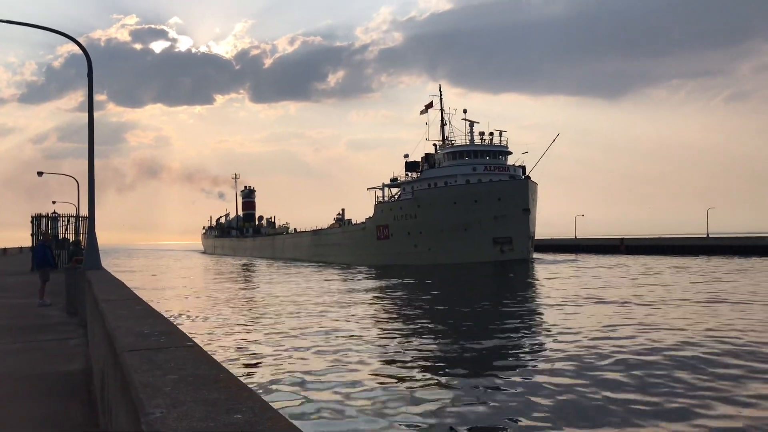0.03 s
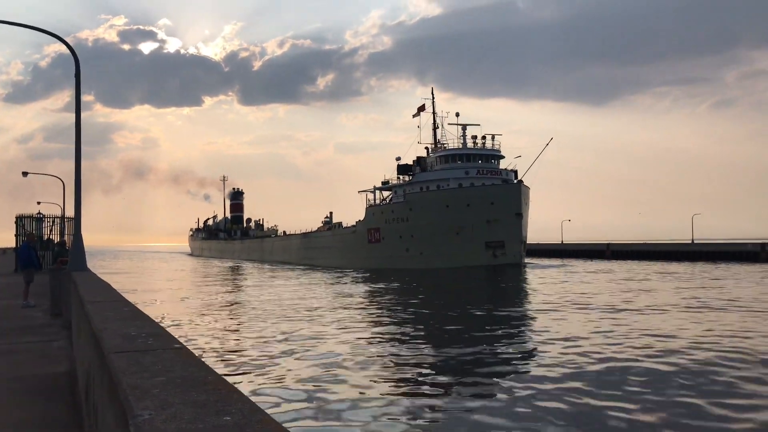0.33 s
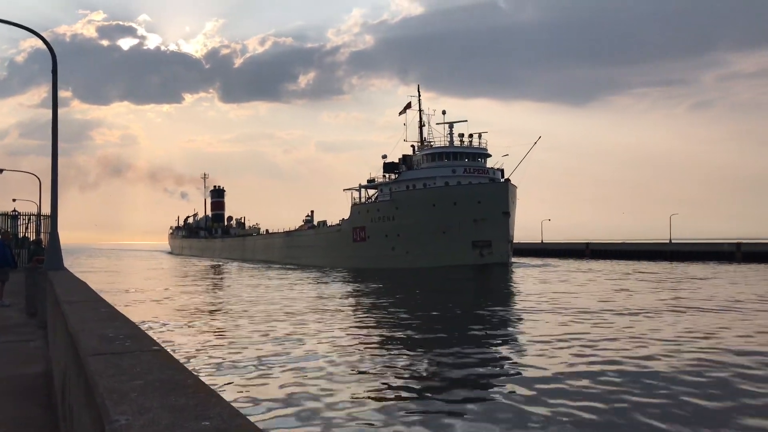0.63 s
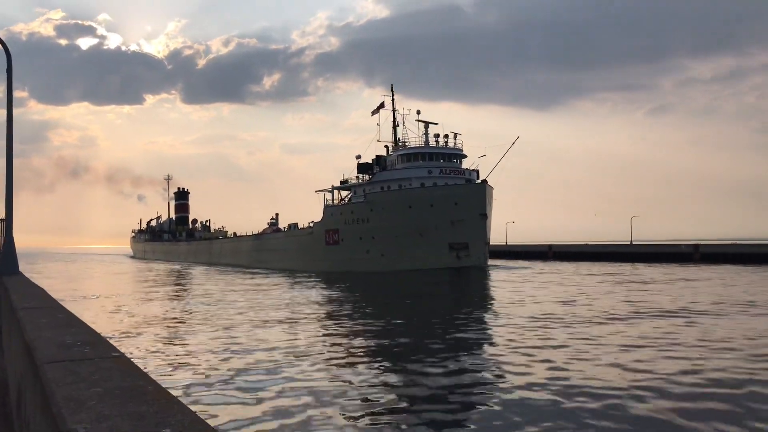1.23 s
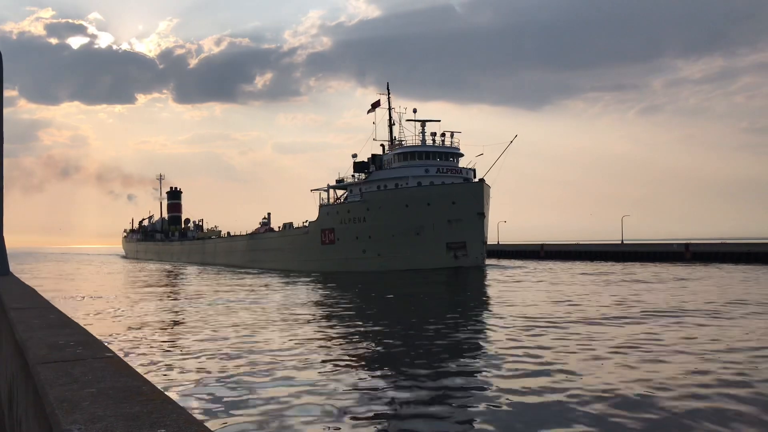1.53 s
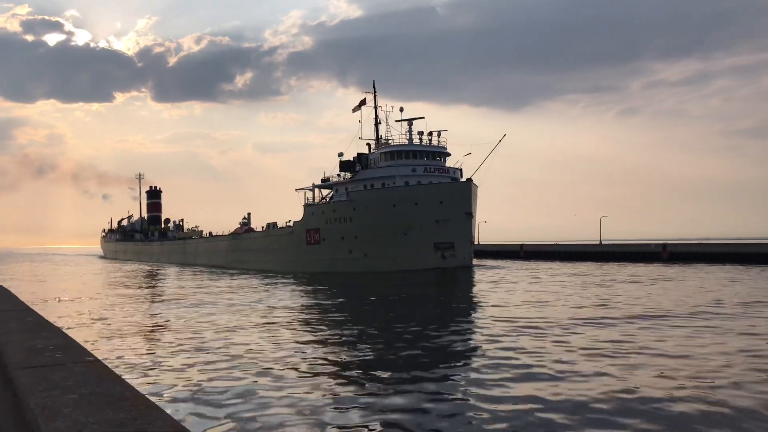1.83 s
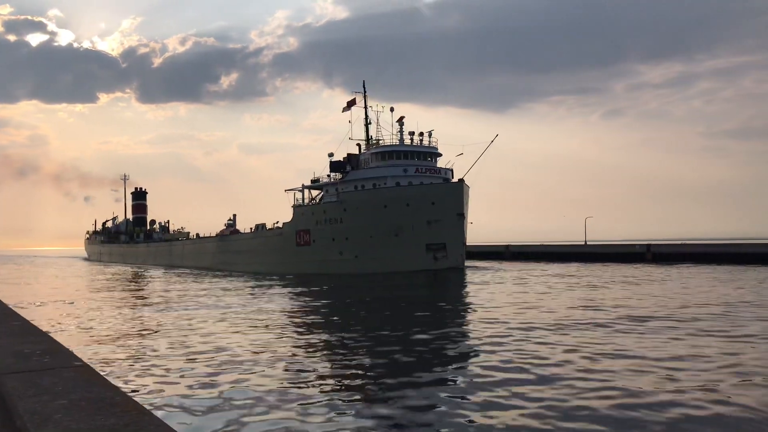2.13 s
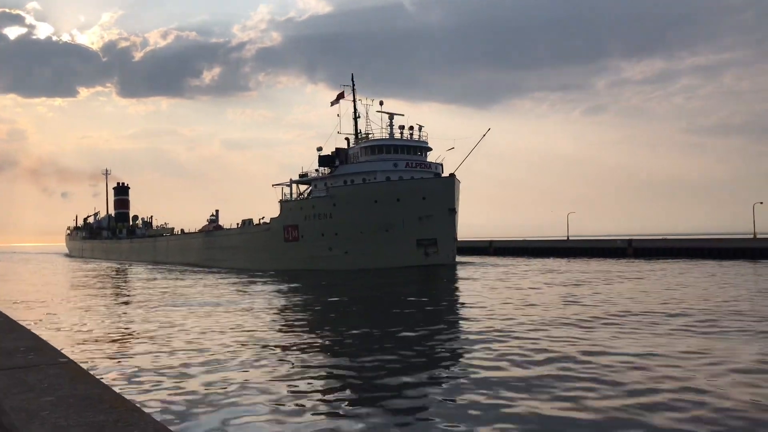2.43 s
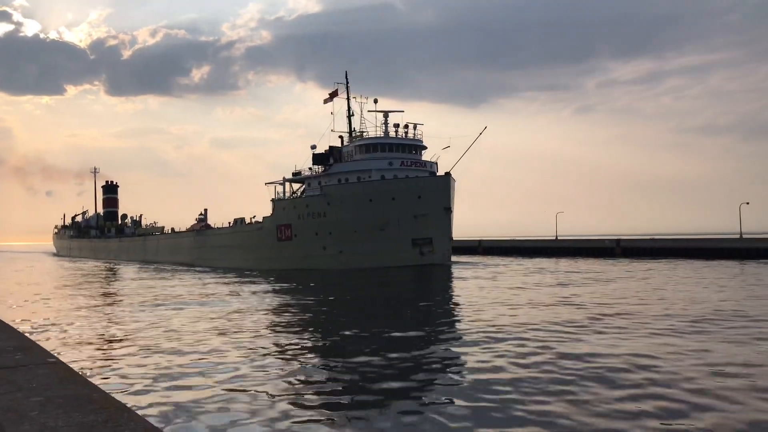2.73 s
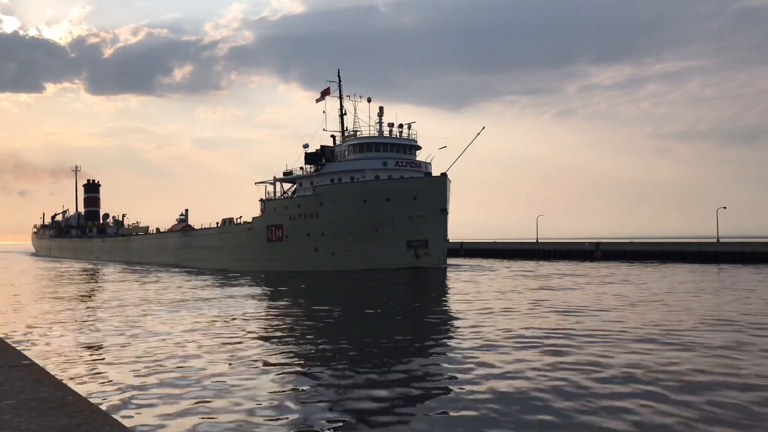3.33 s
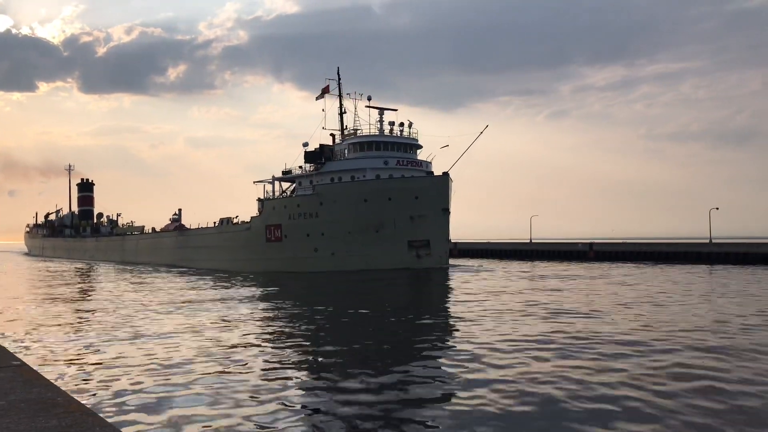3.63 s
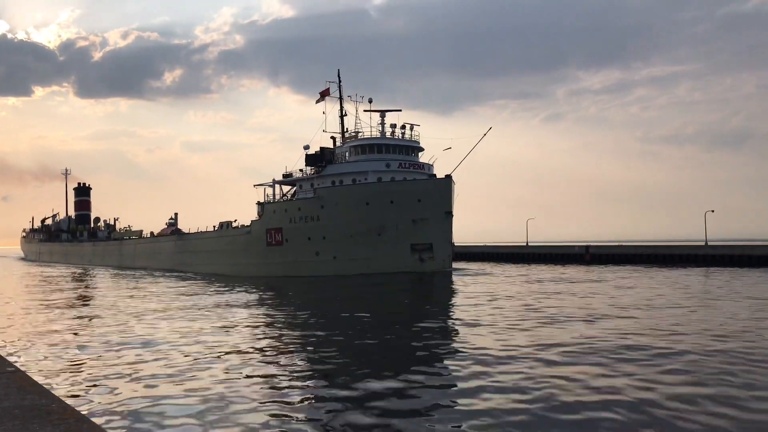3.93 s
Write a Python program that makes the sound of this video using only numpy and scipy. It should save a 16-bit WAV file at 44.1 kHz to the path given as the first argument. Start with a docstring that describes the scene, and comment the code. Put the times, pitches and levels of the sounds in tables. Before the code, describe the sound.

A ship's horn sounds one loud, low, brassy blast and cuts off almost at once. Its echoes swell and fade across a canal, heard from the pier, sinking into quiet engine rumble, wind and rippling water.

```python
"""A ship's air horn ends one low, brassy blast over a canal.
Its diaphragm chops the air into sharp pulses, a harmonic series that a pier and a wall reflect at once.
The shore returns the note by many paths in swelling, fading echoes; a far wall returns it still buzzing.
The echoes sink into the broadband noise of engine rumble, wind and rippling water."""
import sys
import numpy as np
from scipy import signal
from scipy.fft import rfft, irfft
from scipy.io import wavfile
from scipy.ndimage import uniform_filter1d

SR = 44100
rng = np.random.default_rng(int(sys.argv[2]) if len(sys.argv) > 2 else 0)


def store_pcm(level_fs):
    """Save levels as 16-bit WAV."""
    pcm = np.round(np.clip(level_fs, -1, 1) * 32767).astype(np.int16)
    wavfile.write(sys.argv[1], SR, np.atleast_2d(pcm).T)


N = 176400
T = np.arange(N) / SR
HZ = np.fft.rfftfreq(N, 1 / SR)
START_S, STOP_S = -.2, .4312  # the horn is already sounding at time zero
ECHO_HZ = 148.4  # fundamental of the reflected note


def amp(db):
    """Amplitude ratio of a level in decibels."""
    return 10 ** (np.asarray(db) / 20)


def unit(x):
    """Normalisation to rms 1."""
    return x / np.sqrt(np.mean(x ** 2) + 1e-20)


def curve(rows, t=T, column=1):
    """Linear interpolation of one table column in time."""
    rows = np.array(rows)
    return np.interp(t, rows[:, 0], rows[:, column])


def colour(spectrum, hz=HZ):
    """Spectral envelope: gain interpolated on a log-frequency axis."""
    freq_hz, level_db = np.transpose(spectrum)
    return amp(np.interp(np.log(hz + 1), np.log(freq_hz), level_db))


def noise(gain):
    """Spectrally shaped Gaussian noise of rms 1."""
    return unit(irfft(rfft(rng.standard_normal(N)) * gain, N))


def drift(rate_hz):
    """Random modulation: low-pass noise of rms 1."""
    return noise(1 / (1 + (HZ / rate_hz) ** 4))


def causal_filter(x, gain):
    """Minimum-phase filtering: the phase follows from the log gain by the Hilbert transform."""
    log_gain = np.log(np.maximum(gain, 1e-5))
    phase = -signal.hilbert(np.r_[log_gain, log_gain[-2:0:-1]]).imag[:len(gain)]
    response = irfft(gain * np.exp(1j * phase), N)[:4096]
    return signal.oaconvolve(x, response)[:len(x)]


# strength of the blast: time_s, level_db
BLAST_LEVEL = [(0, 2.5), (.14, 0.5), (.27, 4.3), (.36, 3), (.43, -3.5)]


def pulse_train(emitted_s, delay_s, path_db, wander_s):
    """Propagation delay: moving air varies the travel time of the pulses along one path."""
    jitter_s, flutter_db, shut_db_per_s = 4e-6, 1.56, 1710
    age = emitted_s - START_S
    travel_s = delay_s + wander_s * np.interp(age, T, drift(12))
    arrival = (age + travel_s + jitter_s * rng.standard_normal(len(age))) * SR
    flutter = flutter_db * np.interp(age, T, drift(52))
    shut_off = shut_db_per_s * np.maximum(emitted_s - STOP_S, 0)
    size = amp(path_db + curve(BLAST_LEVEL, emitted_s) + flutter - shut_off)
    taps = np.arange(-12, 13)  # a windowed sinc places each pulse between samples
    index = arrival.astype(int)[:, None] + taps
    train = np.zeros(N)
    np.add.at(train, index, size[:, None] * np.sinc(index - arrival[:, None]) * np.hanning(len(taps)))
    return train


# the horn's fundamental: time_s, pitch_hz
HORN_PITCH = [(0, 148.9), (.096, 147.9), (.172, 148.4), (.25, 148.8), (.33, 148.1), (.45, 148.5)]
# spectrum of one air pulse: frequency_hz, relative_db
PULSE_SPECTRUM = [(200, -34.5), (297, -1), (445, -23.5), (594, -2.5), (742, -1.5), (890, -1.5), (1040, 0),
                  (1190, 1), (1480, -6.5), (1850, -4), (2200, -12), (2600, -9), (3100, -10), (3500, -9),
                  (4500, -10.5), (5000, -15.5), (5500, -14.5), (6500, -20), (9000, -25.5), (10500, -33),
                  (13000, -37), (15500, -48)]
# four paths (direct, off the pier, off a wall's foot, off its face): delay_s
PATH_DELAYS = [0, .00789, .062, .0632]
# transmission along the same paths: relative_db, cutoff_hz, wander_s
PATH_TRANSMISSION = [(1, 4000, 0.0000064), (-4.5, 12000, 4e-5), (-7.5, 5700, 0.000072), (7, 1310, 0.00009)]


def horn():
    """Periodic excitation: the diaphragm releases one sharp pulse and one puff of air each cycle."""
    t = T + START_S
    pitch_hz = curve(HORN_PITCH, t)
    cycles = np.cumsum(pitch_hz) / SR
    cycles -= np.interp(STOP_S, t, cycles)  # zero at the shut-off
    emitted_s = np.interp(np.arange(int(cycles[0]) + 1, 4), cycles, t)
    pulse_gain = colour(PULSE_SPECTRUM)
    tone = np.zeros(N)
    for delay_s, (path_db, cutoff_hz, wander_s) in zip(PATH_DELAYS, PATH_TRANSMISSION):
        train = pulse_train(emitted_s, delay_s, path_db, wander_s)
        tone += causal_filter(train, pulse_gain / np.hypot(1, HZ / cutoff_hz))
    puff_decay_s, highpass_hz = .0027, 4250
    puffs = np.exp(-(cycles % 1) / pitch_hz / puff_decay_s) * (cycles < 1)
    highpass = (HZ / np.hypot(HZ, highpass_hz)) ** 2
    air = causal_filter(puffs * rng.standard_normal(N), pulse_gain * highpass)
    sounding = (t > 0) & (t < STOP_S)
    blast = amp(-15.5) * tone / tone[sounding].std() + amp(-35) * air / air[sounding].std()
    heard = blast[t >= 0]
    return np.pad(heard, (0, N - len(heard)))


def horn_fundamental():
    """Resonance: the fundamental lags each pulse and decays exponentially once the air is shut off."""
    lag_cycles, release_s = .33, .48
    sag_db_per_s, fade_db_per_s = 3, 131.5
    cycles = np.cumsum(curve(HORN_PITCH)) / SR
    cycles -= np.interp(STOP_S, T, cycles) + lag_cycles
    sag = sag_db_per_s * np.minimum(T, release_s)
    fade = fade_db_per_s * np.clip(T - release_s, 0, 1)
    return -np.sqrt(2) * amp(-13.5 - sag - fade) * np.cos(2 * np.pi * cycles)


def metallic_bite(x, spacing_hz=888, depth_db=2.6, onset_hz=2600):
    """Comb filtering: evenly spaced treble peaks make the blast sound metallic."""
    treble = 1 - 1 / (1 + (HZ / onset_hz) ** 6)
    return causal_filter(x, amp(depth_db * np.cos(2 * np.pi * HZ / spacing_hz) * treble))


def blurred_harmonics(spectrum, first, last):
    """Line broadening: many paths blur each harmonic into a noise band; the sum is held level."""
    harmonic = np.maximum(np.round(HZ / ECHO_HZ), 1)
    width_hz, steepness = .5 + harmonic, 1.714
    skirt = np.hypot(1, (HZ - harmonic * ECHO_HZ) / width_hz) ** steepness
    lines = colour(spectrum) / np.sqrt(width_hz) / skirt
    band = noise(lines * (harmonic >= first) * (harmonic <= last))
    return band / np.sqrt(uniform_filter1d(band ** 2, size=4000))


def near_scatter(cutoff_hz=3500, fade_db_per_s=106.5):
    """Diffuse scattering: near reflections surround the blast with a dull haze."""
    overtones = blurred_harmonics(PULSE_SPECTRUM, first=4, last=60)
    haze = causal_filter(overtones, 1 / (1 + (HZ / cutoff_hz) ** 2))
    return amp(-25 - fade_db_per_s * np.maximum(T - STOP_S, 0)) * haze


# spectral density of engine and wind: frequency_hz, relative_db
RUMBLE_SPECTRUM = [(20, -38), (31, -33), (42, -2.5), (55, -0.5), (69, 3.5), (80, -2), (100, -5.5),
                   (125, -7.5), (148, -1), (175, -10), (235, -11.5), (275, -12), (340, -11.5), (500, -34.5),
                   (900, -73)]
# envelope of the rumble: time_s, level_db
RUMBLE_ENVELOPE = [(0, -53), (.75, -59.5), (1.0, -45.5), (1.35, -42), (1.7, -40.5), (2.8, -40), (4, -40)]


def engine_rumble(throb_hz=8.1, throb_db=.5):
    """Amplitude modulation: the low noise of the ship's engine and the wind throbs unevenly."""
    throb = np.sin(2 * np.pi * throb_hz * T + .53 * drift(1.5))
    return amp(curve(RUMBLE_ENVELOPE) + throb_db * throb) * noise(colour(RUMBLE_SPECTRUM))


# spectral density of ripples and breeze: frequency_hz, relative_db
WASH_SPECTRUM = [(150, -20), (400, 4), (700, 5), (1200, 4), (1700, 0), (2500, -2.5), (3600, -4.5),
                 (4800, -13.5), (6300, -15), (7600, -25), (9400, -26.5), (10500, -34), (13000, -31.5),
                 (15500, -45)]
# envelope of the wash: time_s, level_db
WASH_ENVELOPE = [(0, -34.5), (.75, -47.5), (1.2, -48.5), (2.0, -48), (2.45, -47.5), (2.75, -45.5),
                 (3.3, -46.5), (4, -46)]


def water(drops_per_s=21, drop_decay_s=.003):
    """Broadband noise of ripples and breeze, with a Poisson process of tiny splashes at the pier."""
    wash = amp(curve(WASH_ENVELOPE) + .5 * drift(6.3)) * noise(colour(WASH_SPECTRUM))
    onsets = rng.random(N) < drops_per_s / SR
    drops = onsets * amp(3 * np.minimum(rng.exponential(1, N), 3))
    decays = signal.lfilter([1], [1, -np.exp(-1 / (drop_decay_s * SR))], drops)
    splashes = decays * noise(HZ / (1 + (HZ / 5000) ** 3))
    return wash + amp(-81.5) * unit(splashes)


# overtones that outlast the blast: harmonic_number, level_db
LINGERING_HARMONICS = [(4, -36), (5, -35.5)]


def canal_ring(rise_s=.046, end_s=.76, fade_s=.056):
    """Reverberation: two middle overtones persist in the canal briefly after the shut-off."""
    envelope = np.clip((T - STOP_S) / rise_s, 0, 1) * (1 - np.tanh((T - end_s) / fade_s)) / 2
    tones = sum(amp(level_db) * np.sin(2 * np.pi * harmonic * ECHO_HZ * T + .3 * drift(5.8))
                for harmonic, level_db in LINGERING_HARMONICS)
    return np.sqrt(2) * envelope * tones


# envelope of the echoes' fundamental: time_s, level_db
SHORE_FUNDAMENTAL = [(.66, -36), (.74, -28.5), (.95, -27.5), (1.03, -35), (1.16, -24.3), (1.27, -25),
                     (1.34, -32), (1.42, -33), (1.5, -46), (1.62, -32), (1.75, -35.5), (1.92, -37.5),
                     (2.02, -48), (2.25, -38.5), (2.35, -37), (2.43, -44), (2.6, -41), (3.2, -48)]
# envelope of their second harmonic: time_s, level_db
SHORE_OCTAVE = [(.54, -45), (.59, -30.5), (.66, -44), (.76, -30), (.83, -38.5), (.92, -27), (1.01, -42),
                (1.18, -25), (1.33, -29), (1.42, -32.5), (1.54, -34), (1.78, -33.5), (1.87, -46.5),
                (2.25, -46.5), (2.4, -50), (3.0, -50)]
# envelopes of their overtone bands: time_s, low_db, middle_db
SHORE_BANDS = [(.5, -30, -39), (.66, -31.5, -38), (.78, -37.5, -39.5), (.88, -39.5, -37.5),
               (1.0, -36.5, -36), (1.18, -33, -31.5), (1.4, -31.5, -33), (1.52, -37, -34.5),
               (1.78, -35.5, -38.5), (1.92, -42.5, -41), (2.3, -44, -46), (2.85, -47, -53.5), (4, -60, -59)]
# spectrum of the reflected overtones: frequency_hz, relative_db
ECHO_SPECTRUM = [(445, -3), (594, -2), (742, -2), (890, 5), (1190, 4.5), (1480, 1), (1900, -5),
                 (2600, -11.5), (3500, -16), (4500, -23), (5200, -31.5), (7000, -52), (10000, -61)]


def shore_echoes(rise_s=.03, tail_db_per_s=8, dulling_db_per_s=5):
    """Multipath reflection: two clean partials and blurred overtones; longer paths lose more treble."""
    out = np.zeros(N)
    for harmonic, envelope in enumerate([SHORE_FUNDAMENTAL, SHORE_OCTAVE], 1):
        start_s, end_s = envelope[0][0], envelope[-1][0]
        onset = np.clip((T - start_s) / rise_s + 1, 0, 1)
        level_db = curve(envelope) - tail_db_per_s * np.maximum(T - end_s, 0)
        phase = 2 * np.pi * harmonic * ECHO_HZ * T + .5 * drift(11.6)
        out += np.sqrt(2) * onset * amp(level_db) * np.sin(phase)
    low_db, middle_db = curve(SHORE_BANDS, column=1), curve(SHORE_BANDS, column=2)
    treble_db = middle_db - 4.5 - dulling_db_per_s * (T - STOP_S)
    for first, last, level_db in [(3, 5, low_db), (6, 13, middle_db), (14, 70, treble_db)]:
        out += amp(level_db) * blurred_harmonics(ECHO_SPECTRUM, first, last)
    return out


def far_wall_echo(centre_s=1.27, half_length_s=.24, wander_s=8e-5):
    """Coherent reflection: a large far wall returns the overtones in phase, so they keep their buzz."""
    warped_s = T + wander_s * drift(13)
    overtones_hz = ECHO_HZ * np.arange(4, 30)
    gains = colour(ECHO_SPECTRUM, overtones_hz)
    buzz = sum(gain * np.cos(2 * np.pi * hz * warped_s) for hz, gain in zip(overtones_hz, gains))
    envelope = np.exp(-((T - centre_s) / half_length_s) ** 4)
    return -amp(-37.5) * envelope * unit(buzz)


def scene():
    """Superposition: the blast, its reflections and the background add in one channel."""
    blast = metallic_bite(horn() + near_scatter()) + horn_fundamental()
    reflections = canal_ring() + far_wall_echo() + shore_echoes()
    return (blast + reflections + engine_rumble() + water())[None]


def record(dry, cutoff_hz=15850):
    """Band limiting: a linear-phase low-pass filter removes the highest treble."""
    lowpass = signal.firwin(511, cutoff_hz, window=("kaiser", 9), fs=SR)
    return signal.oaconvolve(dry, lowpass[None], "same")


dry = scene()
out = record(dry)
store_pcm(out)
```